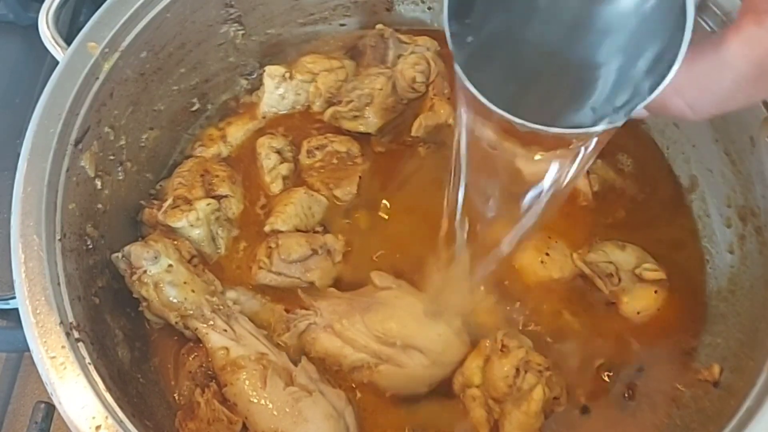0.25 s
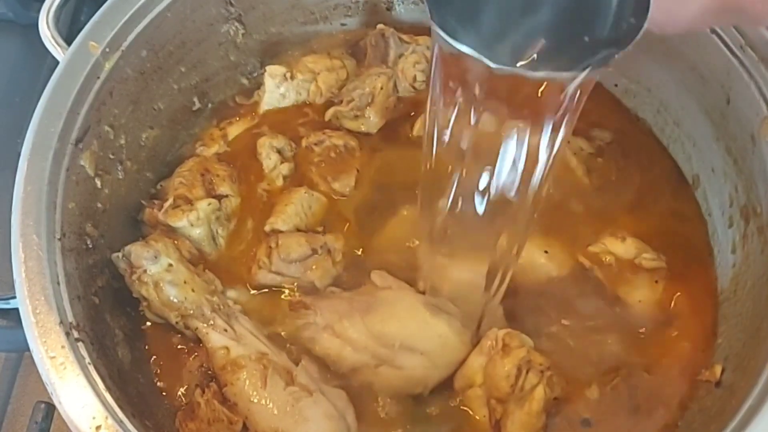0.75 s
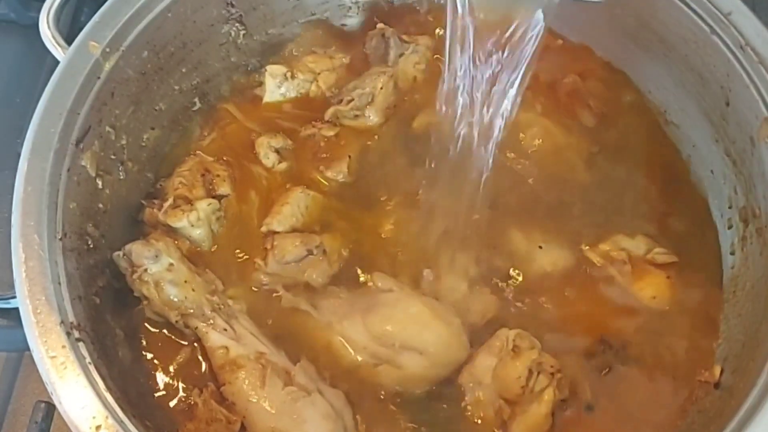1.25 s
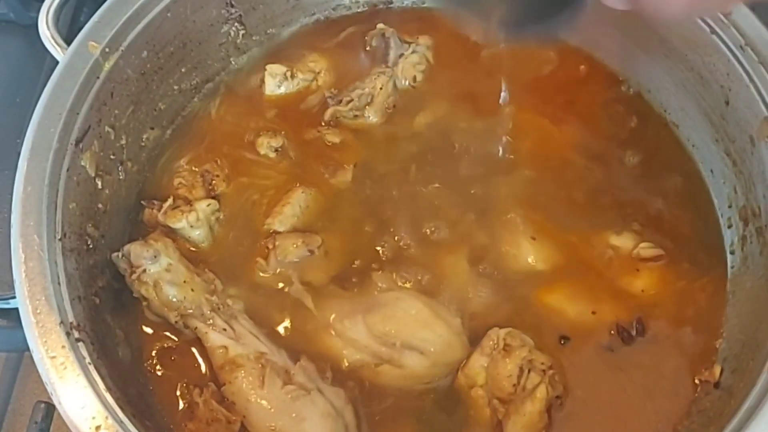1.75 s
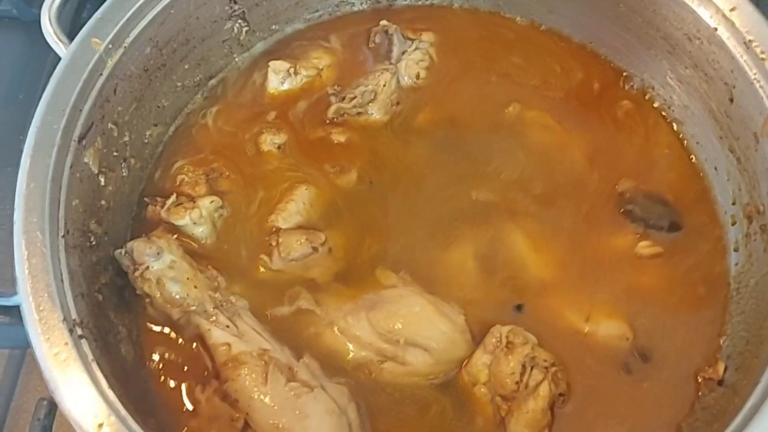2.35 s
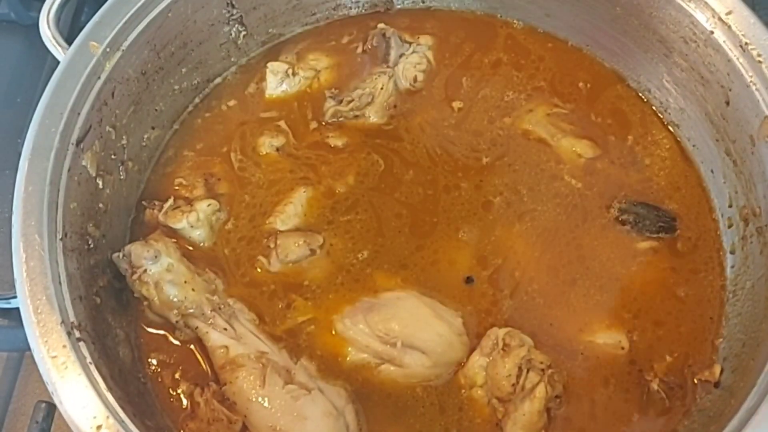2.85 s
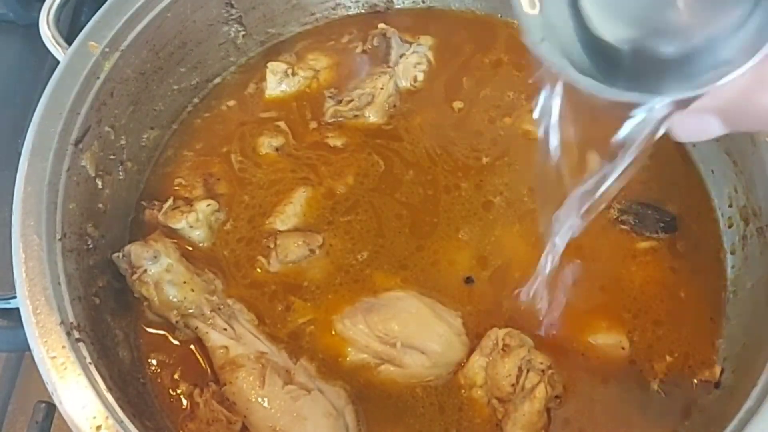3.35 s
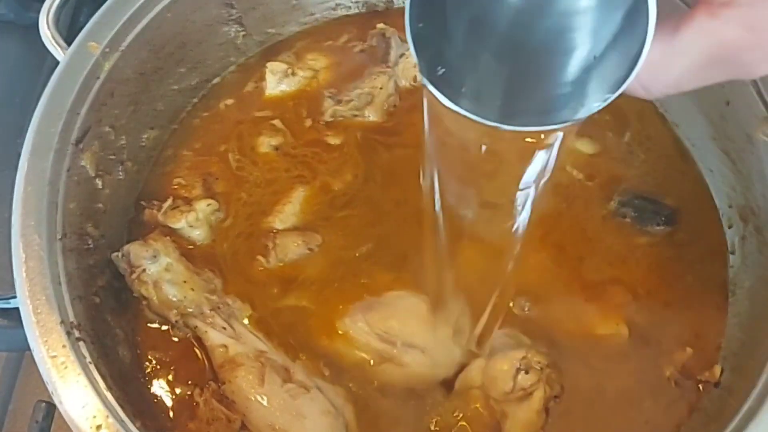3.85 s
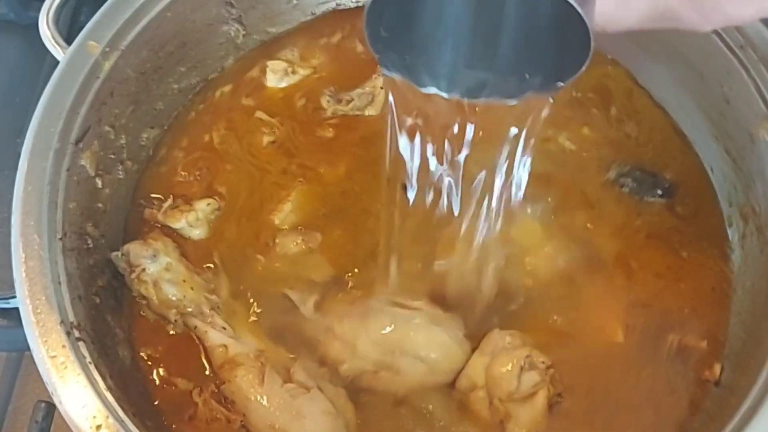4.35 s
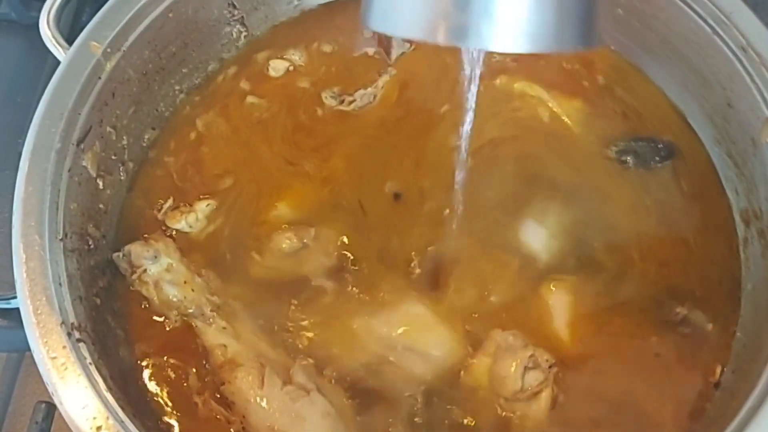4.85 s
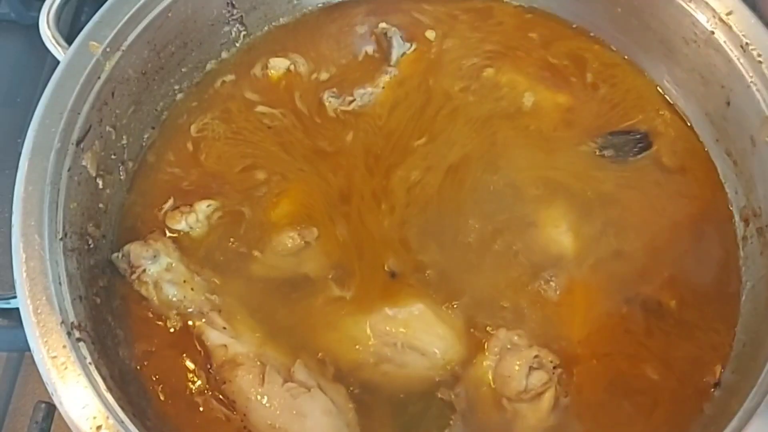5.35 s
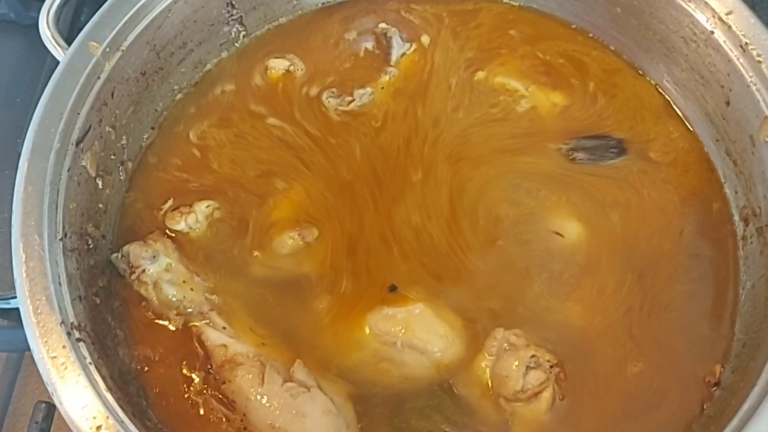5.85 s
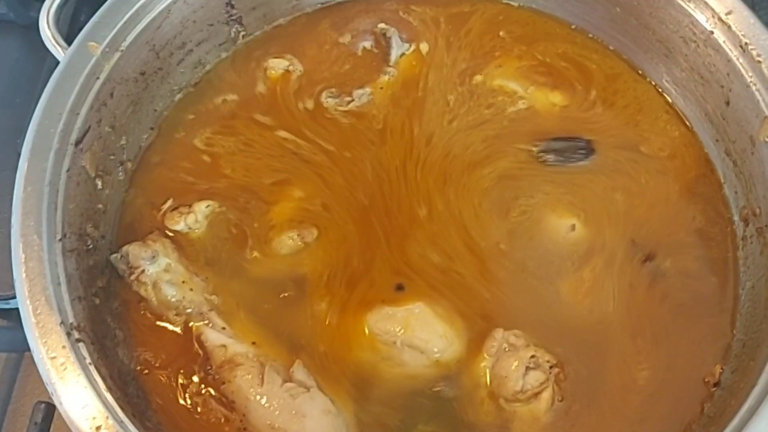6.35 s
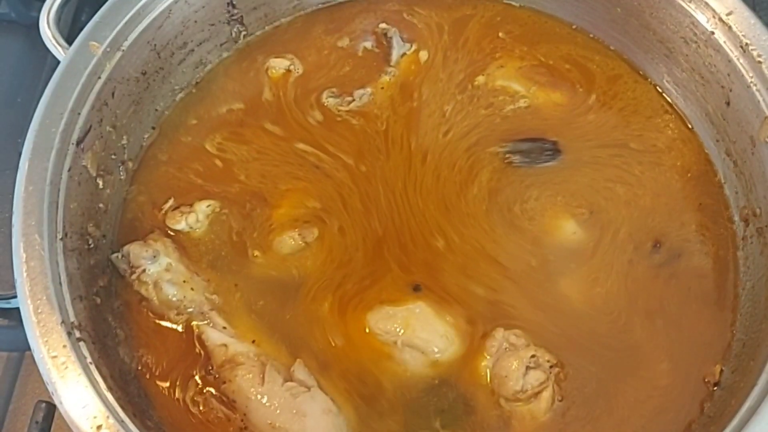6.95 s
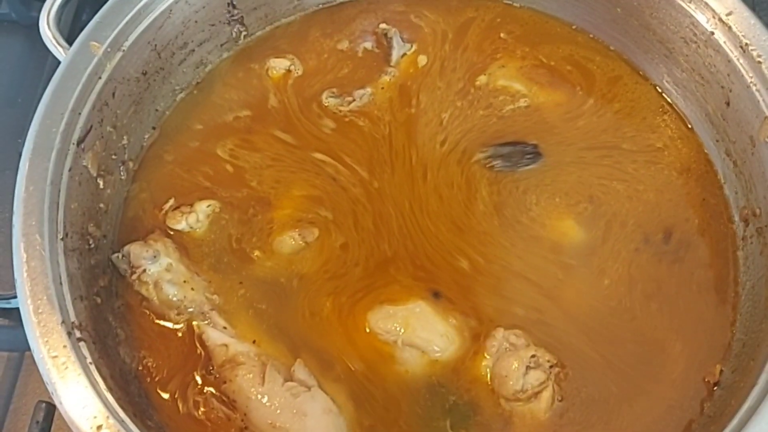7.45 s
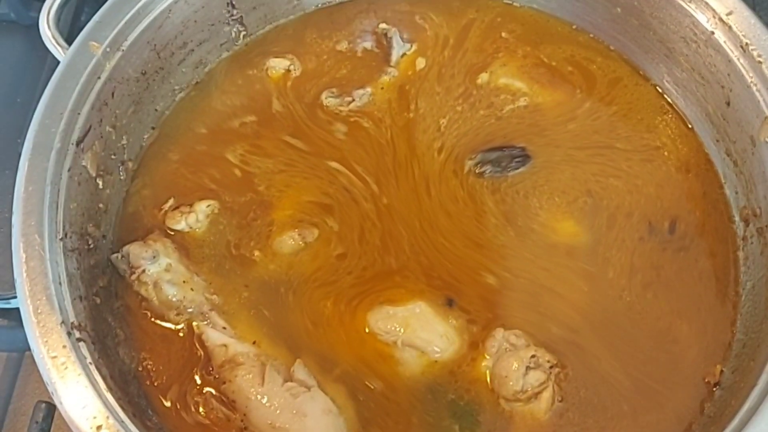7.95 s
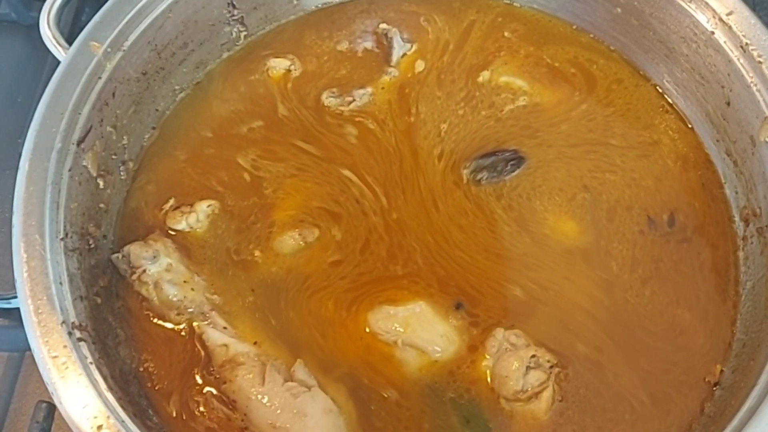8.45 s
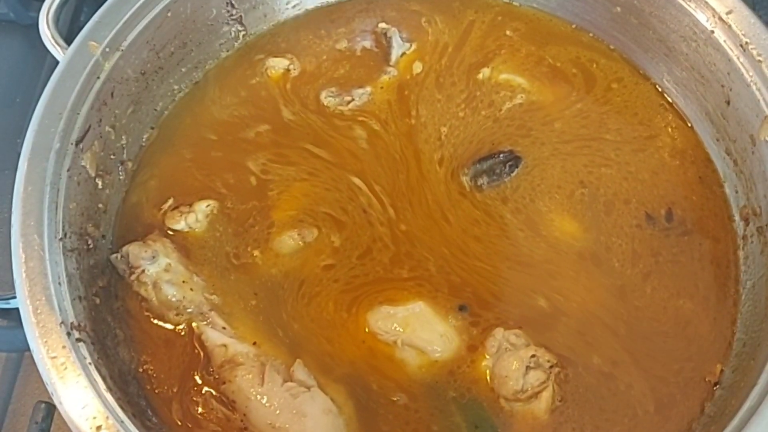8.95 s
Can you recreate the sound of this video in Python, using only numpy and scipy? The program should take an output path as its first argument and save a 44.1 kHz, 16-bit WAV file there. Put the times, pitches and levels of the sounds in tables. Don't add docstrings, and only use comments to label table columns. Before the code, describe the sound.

In a home kitchen, close above a steel pot, a cup of water is poured into stew with a knock on the metal, bright hiss and ringing bubbles, then stops short. A second, lighter pour follows and thins to drips and faint fizz. A steel cup thuds and rings on the counter, twice, with soft hand scuffs. A low fan drones throughout.

```python
import sys
import numpy as np
from scipy import signal
from scipy.io import wavfile
from scipy.ndimage import uniform_filter1d

SR = 44100
rng = np.random.default_rng(int(sys.argv[2]) if len(sys.argv) > 2 else 0)


def store_pcm(level_fs):
    pcm = np.round(np.clip(level_fs, -1, 1) * 32767).astype(np.int16)
    wavfile.write(sys.argv[1], SR, np.atleast_2d(pcm).T)


def rack_gain(trim_db):
    fader = np.asarray(trim_db, float)
    return 10 ** (fader / 20)


N = 405719
FIZZ_FROM_S = 3.06

POT_AIR_HZ = [1770, 2730, 4090, 5500, 6600, 8200]
# start_s, peak_db
FIRST_LANDING = [
    (6.6843, -14),
    (6.692, -17.5),
    (6.717, -27.5),
    (7.036, -62),
    (7.077, -52),
]
# start_s, peak_db
SECOND_LANDING = [
    (7.811, -54),
    (7.843, -15),
    (7.853, -32),
    (7.862, -18),
    (7.877, -18.5),
    (7.885, -37),
    (7.905, -51),
]


def evened(x):
    return x / np.sqrt(np.mean(x ** 2) + 1e-20)


def read(points, hz):
    f, value = np.transpose(points)
    return np.interp(np.log(hz + 1), np.log(f + 1), value)


def add(mix, s, sound):
    part = mix[round(s * SR):][:len(sound)]
    part += sound[:len(part)]


def resonate(x, hz, width_hz):
    radius = np.exp(-np.pi * width_hz / SR)
    turn = np.exp(2j * np.pi * hz / SR)
    return 2 * signal.lfilter([1 - radius], [1, -radius * turn], x).real


def noise(level_db, size):
    t = np.arange(4 * N // size + 6) * size / 4 / SR
    hz = np.fft.rfftfreq(size, 1 / SR)
    real, imaginary = rng.standard_normal((len(t), len(hz), 2)).T
    gain = rack_gain(level_db(t, hz[:, None])) * np.sqrt(2 * SR / size)
    spectra = (real + 1j * imaginary) * gain
    return signal.istft(spectra, nperseg=size, noverlap=3 * size // 4)[1][:N]


def blotches(t, hz, frames, bins):
    field = rng.standard_normal((len(t), len(hz))).T
    return evened(uniform_filter1d(uniform_filter1d(field, frames, 1), bins, 0))


def coloured(x, points):
    log_gain = np.log(rack_gain(read(points, abs(np.fft.fftfreq(4096, 1 / SR)))))
    taps = np.fft.ifft(np.exp(np.conj(signal.hilbert(log_gain)))).real[:2048]
    return signal.oaconvolve(x, taps)[:len(x)]


def strokes(rows, t, rise, fall):
    db = [level - rise * np.maximum(s - t, 0) - fall * np.maximum(t - s - hold, 0) for s, level, hold in rows]
    return np.maximum(np.max(db, axis=0), -110)


def flow(t):
    # start_s, flow_db, spread (0 narrow jet to 1 broad sheet)
    pours = [
        [(0.0, -50.5, 0.2), (0.1, -54, 0.2), (0.23, -58.5, 0.8), (0.46, -60.5, 0.8), (0.69, -56, 0.25),
         (0.95, -46, 0.5), (1.2, -47, 0.43), (1.75, -54.5, 0.15), (2.09, -55, 0.04)],
        [(3.57, -53, 0.4), (3.79, -62, 0.7), (3.87, -57, 0), (4.06, -53.5, 0.9), (4.25, -60, 0.9),
         (4.66, -60.5, 0.4), (5.2, -64, 0.8), (6.04, -75, 0.05), (6.66, -68.5, 0.4)],
    ]
    # start_s, flow_db, hold_s
    slops = [
        (3.085, -60.5, 0.077),
        (3.196, -57, 0.13),
        (3.4, -62, 0.028),
    ]
    db = strokes(slops, t, rise=4300, fall=230)
    spread = np.full(len(t), 0.31)
    for rows in pours:
        s, level, wide = np.transpose(rows)
        on = (t >= s[0]) & (t <= s[-1])
        db[on] = np.interp(t[on], s, level)
        spread[on] = np.interp(t[on], s, wide)
    return db, spread


def water_db(t, hz):
    water_hz = [1400, 2800, 6400, 13000]
    jet_db = [-41, -44.5, -38.5, -46.5]
    sheet_db = [-32, -38, -44.5, -42]
    db, spread = flow(t)
    jet = read(list(zip(water_hz, jet_db)), hz)
    sheet = read(list(zip(water_hz, sheet_db)), hz)
    return db + jet + spread * (sheet - jet) - 30 * (hz < 900)


def spray():
    def level(t, hz):
        broad_flicker = 2.0 * blotches(t, hz, frames=5, bins=45)
        narrow_flicker = 2.1 * blotches(t, hz, frames=14, bins=3)
        return water_db(t, hz) - 1.0 + broad_flicker + narrow_flicker
    return noise(level, size=128)


def bubble(hz, cycles, rise):
    turns = np.arange(1200) * hz / SR
    tone = np.sin(2 * np.pi * turns * (1 + rise * turns / cycles))
    return tone * np.exp(-2.0 * turns / cycles) * np.minimum(turns / 1.8, 1)


def puff(hz, share, quick_s, slow_s, tail):
    t = np.arange(900) / SR
    burst = rng.standard_normal(len(t)) * (np.exp(-t / quick_s) + tail * np.exp(-t / slow_s))
    return resonate(resonate(burst, hz, share * hz), hz, share * hz) / np.sqrt(share * hz / SR)


def froth():
    out = np.zeros(N)
    t = np.arange(0, N + 64, 64) / SR
    now = np.arange(N) / SR
    crowd = np.interp(now, t, np.clip(rack_gain(0.6 * (flow(t)[0] + 56)), 0.4, 3))
    for hz in np.geomspace(1900, 15000, num=36):
        size = rack_gain(4.5 * np.minimum(rng.exponential(1, N), 3))
        size *= (rng.random(N) < 32.0 * crowd / SR) / crowd ** 0.7
        distance = np.min(abs(np.log(hz / np.array(POT_AIR_HZ))))
        favoured_db = 6.0 * np.exp(-(distance / 0.05) ** 2)
        size *= rack_gain(np.interp(now, t, water_db(t, hz)) + 32.0 + favoured_db)
        size *= rack_gain(1.0 * np.log2(hz / 6000))
        ring = bubble(hz, cycles=rng.uniform(2.0, 37.0), rise=rng.uniform(0, 0.04))
        out += signal.oaconvolve(size, ring)[:N]
    return out * rack_gain(-14.0 * np.maximum(now - 4, 0))


def gurgle():
    # start_s, end_s, pitch_hz, level_db over the flow
    runs = [
        (0.8, 2.05, 4090, 0),
        (0.9, 1.35, 1780, -8),
        (0.9, 1.2, 3200, -2),
        (3.8, 4.17, 2700, 5),
        (3.9, 4.3, 3800, 2),
        (3.85, 4.15, 5300, 2),
        (1.1, 1.9, 6500, 0),
        (3.15, 3.33, 3400, 0),
        (3.6, 3.67, 2300, 0),
        (4.05, 4.15, 2000, 0),
    ]
    out = np.zeros(N)
    now = np.arange(N) / SR
    level = rack_gain(flow(now)[0])
    bubbles_per_s = 110.0
    for start, end, hz, db in runs:
        for pitch in (0.95, 0.985, 1.02, 1.06):
            size = rack_gain(db + 3.0 * np.minimum(rng.exponential(1, N), 3))
            size *= rng.random(N) < bubbles_per_s / 4 / SR
            size *= level * (now > start) * (now < end)
            out += signal.oaconvolve(size, bubble(pitch * hz, 18, rise=0.02))[:N]
    return out


def plops():
    # start_s, peak_db, pitch_hz
    first_pour = [(0.031, -29, 3550), (0.081, -35, 5500), (0.092, -31, 3400), (0.1469, -50, 13090),
                  (0.163, -33.5, 3230), (0.2093, -37, 4500), (0.3871, -45, 7060), (0.5865, -36, 2670),
                  (0.622, -38.5, 3970), (0.7118, -30, 3720), (0.7108, -31, 2550), (0.7143, -32, 5140),
                  (0.7637, -37.5, 5200), (0.7966, -34, 1880), (0.8484, -31, 3920), (0.88, -31, 3980),
                  (0.93, -34, 11400), (0.947, -33, 5570), (0.971, -41, 1840), (0.976, -42, 4200),
                  (1.075, -40, 1780), (1.141, -29.5, 3770), (1.394, -32.5, 3040), (1.561, -36, 8000),
                  (1.6439, -37.5, 6850), (1.755, -39, 8450), (1.784, -36, 6000), (1.884, -41, 7920),
                  (2.091, -47, 10700), (1.21, -40, 6550)]
    # start_s, peak_db, pitch_hz
    second_pour = [(3.0917, -49, 8440), (3.1292, -45, 5600), (3.1626, -38, 2600), (3.1953, -38, 5600),
                   (3.2156, -38, 3100), (3.225, -36, 4700), (3.225, -38, 7700), (3.2374, -37, 6060),
                   (3.279, -39.5, 7600), (3.3106, -41, 3930), (3.4986, -49, 5900), (3.5733, -39, 7460),
                   (3.6169, -33.5, 4200), (3.635, -37.5, 2620), (3.83, -33.5, 2500), (3.8621, -38, 2540),
                   (3.9434, -44, 7900), (4.0254, -38, 6650), (4.0392, -38, 5880), (4.0682, -36.5, 5470),
                   (4.0638, -39, 2630), (4.1161, -37, 8260), (4.125, -34, 2700), (4.1618, -36, 3720),
                   (4.2496, -39, 4200), (4.306, -36, 7160), (4.4985, -39.5, 3750), (4.641, -29.5, 7130),
                   (4.6757, -39, 4400), (6.3074, -43.5, 7550)]
    # start_s, peak_db, pitch_hz
    fainter = [(.205, -42, 7900), (.261, -49, 6450), (.270, -51, 8600), (.527, -44.5, 4300),
               (.540, -48, 8500), (.645, -38, 6800), (0.698, -43, 5170), (.794, -42, 6760),
               (1.061, -36, 2600), (1.255, -49, 8500), (1.357, -39, 5030), (1.44, -44, 6860),
               (1.598, -42, 7700), (1.622, -41, 7300), (1.842, -45, 3970), (1.867, -41, 8200),
               (2.027, -39, 6400), (3.152, -45, 8000), (3.205, -42, 6500), (3.255, -43, 8700),
               (3.292, -43, 7500), (3.361, -49.5, 6100), (3.47, -46, 3080), (3.553, -45, 4100),
               (3.603, -42, 7900), (3.655, -43, 5850), (3.746, -49, 7900), (3.807, -49, 8200),
               (3.855, -44, 7350), (3.92, -39.5, 2680), (3.965, -39, 2700), (4.275, -53, 8150),
               (4.296, -40, 2780), (4.334, -49, 7100), (4.427, -49, 7900), (4.45, -45, 4930),
               (4.517, -43, 2500), (4.535, -45, 7750), (4.578, -45, 7200), (4.617, -42, 2660),
               (5.0, -51, 7140), (5.113, -54, 8000)]
    out = np.zeros(N)
    for s, db, hz in first_pour + second_pour + fainter:
        cycles = np.clip(0.0022 * hz, 7, 30)
        splash = puff(1.06 * hz, share=0.24, quick_s=0.0024, slow_s=0.005, tail=0.2)
        rustle = puff(hz, share=0.12, quick_s=0.005, slow_s=0.008, tail=0.4)
        add(out, s, rack_gain(db + 2.5) * bubble(hz, cycles, rise=0.03))
        add(out, s, rack_gain(db - 11.5) * splash)
        add(out, s + 0.003, rack_gain(db - 19.0) * rustle)
    return out


def ticks():
    # start_s, peak_db
    drops = [(0.1453, -30), (0.4255, -37), (0.492, -40), (0.919, -32), (1.0453, -26.5), (1.154, -30),
             (1.387, -33), (1.7207, -32), (1.753, -34), (3.088, -41), (3.198, -37), (3.2633, -36),
             (3.7022, -54), (3.7287, -46), (3.8868, -34.5), (3.9551, -42), (4.115, -30.5), (4.16, -33),
             (4.212, -36), (4.568, -36), (4.605, -38), (4.6397, -41), (4.676, -39), (4.823, -42),
             (4.9733, -43), (5.2218, -39.5), (5.742, -49), (6.31, -38.5), (6.4669, -48), (6.508, -44.5)]
    # pitch_hz, level_db per Hz
    tick_colour = [(1500, -24), (3500, 0), (7000, -4), (10000, -2)]
    out = np.zeros(N)
    t = np.arange(900) / SR
    fade = np.exp(-t / 0.0039) + 0.44 * np.exp(-t / 0.022)
    for s, db in drops:
        add(out, s, rack_gain(db - 9.0) * rng.standard_normal(len(t)) * fade)
    return coloured(out, tick_colour)


def specks():
    # start_s, peak_db, centre_hz
    first_pour = [(0.0224, -40, 11000), (0.0428, -43, 11500), (0.0797, -41, 14900), (0.2094, -45, 12000),
                  (0.2414, -47, 12600), (0.2853, -46, 15700), (0.2972, -41, 11200), (0.3084, -48, 12200),
                  (0.3671, -53, 10400), (0.401, -47, 12400), (0.4653, -50, 12300), (0.5117, -48, 13900),
                  (0.5264, -41, 11600), (0.5656, -49, 12700), (0.6095, -42, 12400), (0.6534, -46, 15600),
                  (0.6624, -46, 11600), (0.6863, -47, 12600), (0.7287, -44, 12600), (0.7677, -47, 12200),
                  (0.7944, -43, 14100), (0.8634, -39, 12300), (0.9034, -35, 12200), (0.9844, -28, 14900),
                  (1.0024, -39, 12600), (1.256, -32, 11400), (1.4671, -40, 12700), (1.4874, -38, 12300),
                  (1.5459, -37, 13300), (1.5744, -34, 11900), (1.6334, -36, 13000), (1.6654, -44, 13100),
                  (1.7784, -41, 12000), (1.8484, -47, 10100), (1.8667, -38, 11500), (1.9769, -45, 10900),
                  (2.0068, -39, 12100), (2.0263, -46, 13000), (2.0764, -44, 10900)]
    # start_s, peak_db, centre_hz
    second_pour = [(3.0624, -54, 12100), (3.1198, -46, 15300), (3.2131, -38, 12500), (3.3243, -41, 12500),
                   (3.3882, -50, 12700), (3.5019, -47, 13600), (3.5389, -53, 14300), (3.5874, -50, 14700),
                   (3.6032, -47, 13000), (3.7723, -50, 14600), (3.7958, -46, 15700), (3.8482, -44, 14000),
                   (3.9074, -43, 14200), (3.9624, -36, 11500), (4.0317, -45, 15400), (4.0464, -43, 14700),
                   (4.1455, -43, 12200), (4.2547, -53, 14500), (4.2877, -52, 12600), (4.2961, -41, 12700),
                   (4.3365, -49, 15600), (4.3475, -50, 15200), (4.4343, -45, 13700), (4.4548, -44, 11400),
                   (4.4902, -47, 12700), (4.5296, -44, 12800), (4.7167, -43, 13500), (4.7446, -47, 13700),
                   (4.8599, -40, 15100), (4.8798, -45, 11000), (4.9247, -45, 11800), (5.006, -46, 14100),
                   (5.0519, -50, 14700), (5.0843, -50, 13700), (5.1248, -47, 11400), (5.1746, -49, 11900),
                   (5.2614, -47, 11800), (5.2999, -53, 15100), (5.3318, -46, 11800), (5.3966, -44, 11900),
                   (5.4974, -50, 11800), (5.5633, -49, 13100), (5.6012, -47, 12900), (5.6301, -50, 15100),
                   (5.7513, -45, 10700), (5.8406, -56, 13400), (6.0945, -56, 13900), (6.2567, -55, 11500),
                   (6.5635, -53, 11700), (6.6174, -60, 11100), (7.2853, -55, 11900), (7.4684, -53, 12300),
                   (7.5213, -54, 11900), (7.6494, -55, 12100), (7.7294, -58, 11100)]
    out = np.zeros(N)
    for s, db, hz in first_pour + second_pour:
        droplet = puff(min(hz, 15500), share=0.48, quick_s=0.0016, slow_s=0.0055, tail=0.2)
        add(out, s, rack_gain(db - 14.5) * droplet)
    return out


def fizz():
    # pitch_hz, level_db per Hz
    foam_colour = [(3000, -28), (5000, -16), (8000, -10), (12000, 1)]
    # pitch_hz, level_db per Hz
    simmer_colour = [(2500, -18), (4500, -16), (8000, 6.5), (15000, 1)]
    age = np.arange(N) / SR - FIZZ_FROM_S
    bursts = rack_gain(3.0 * np.minimum(rng.exponential(1, N), 3))
    bursts *= (rng.random(N) < 60.0 / SR) * (age > 0)
    shape = signal.lfilter([1], [1, -np.exp(-1 / (0.00174 * SR))], bursts)
    fade = rack_gain(-65 - 3.2 * np.maximum(age - 3.4, 0))
    simmer = rack_gain(-78.5) * (age > 0) * coloured(rng.standard_normal(N), simmer_colour)
    return coloured(fade * shape * rng.standard_normal(N), foam_colour) + simmer


def strike(blows, modes, crack_db, crack_s, rise_s):
    # pitch_hz, level_db per Hz
    crack_colour = [(150, -2), (300, 16), (800, 10.5), (2000, 4), (4000, -0.5), (8000, -7.5), (16000, -10)]
    out = np.zeros(N)
    t = np.arange(SR // 2) / SR
    ring = sum(-rack_gain(level - 60 * t / t60) * np.sin(2 * np.pi * hz * t) for hz, level, t60 in modes)
    for s, db in blows:
        crack = rack_gain(crack_db) * coloured(rng.standard_normal(len(t)), crack_colour) * np.exp(-t / crack_s)
        add(out, s, rack_gain(db) * (ring * np.minimum(t / rise_s, 1) + crack))
    return out


def pot_knock():
    # start_s, peak_db
    blows = [
        (0.1203, -19),
        (0.163, -31),
        (0.187, -30),
    ]
    # pitch_hz, level_db, t60_s
    pot_modes = [(600, -5, .1), (1018, -3, .16), (1087, 2, .05), (1175, -2, .06), (1311, -7, .16),
                 (1586, -2, .05), (1743, -11, .14), (2180, -10, .2), (2292, -11, .3), (3050, -13, .03),
                 (5300, -9, .025), (6100, -9, .025), (7400, -7, .02), (8050, -9, .022)]
    hard = strike(blows[:1], pot_modes, crack_db=-4, crack_s=0.012, rise_s=0.00033)
    soft = strike(blows[1:], pot_modes[:5], crack_db=-30, crack_s=0.012, rise_s=0.002)
    return rack_gain(-10) * (hard + soft)


def board():
    # pitch_hz, level_db, t60_s
    counter_modes = [(111, 5, 0.28), (204, 7, 0.13), (245, 14, 0.055), (286, -2, 0.25), (332, 0, 0.15),
                     (393, 12.5, 0.05), (386, -3, .35), (550, -6, 0.11), (700, -6, 0.07), (864, -4, 0.05)]
    # pitch_hz, level_db, t60_s
    edge_modes = [(110, 1, 0.19), (246, 5, 0.15), (347, 2, 0.08), (369, 4, .14), (480, -3, 0.14),
                  (600, -4, 0.1), (718, -7, 0.15), (1050, -8, 0.05), (1430, -13, .07), (1620, -13, .09),
                  (1830, -15, .07), (2000, -12, 0.04), (3300, -18, .03), (3520, -16, .03)]
    first = strike(FIRST_LANDING[:3], counter_modes, crack_db=2.5, crack_s=0.028, rise_s=0.0027)
    second = strike(SECOND_LANDING[1:], edge_modes, crack_db=-4.5, crack_s=0.0071, rise_s=0.001)
    return rack_gain(-5.5) * first + rack_gain(-10.5) * second


def clustered(pitches, rings, spread, db):
    near = rng.uniform(-spread, spread, (len(pitches), 3))
    modes = [(hz, *ring) for hz, ring in zip(pitches, rings)]
    neighbours = [(hz * (1 + shift), level + db, 0.7 * t60)
                  for (hz, level, t60), row in zip(modes, near) for shift in row]
    return modes + neighbours


def cup():
    upright_hz = [2699, 2783, 2967, 4190, 4514, 6164, 6340, 8150, 8366, 11200, 11860, 12770, 13440]
    # level_db, t60_s
    upright_rings = [(-20, 0.42), (-26, 0.35), (-30, 0.22), (-26, .2), (-18, 0.4), (-28, 0.2), (-23, .3),
                     (-32, .25), (-26, 0.35), (-30, .2), (-21, 0.1), (-28, .17), (-26, .17)]
    aslant_hz = [2666, 2772, 3046, 3490, 4733, 5733, 6055, 7550, 7971, 8361, 10940, 11550, 11910, 14430]
    # level_db, t60_s
    aslant_rings = [(-7, 0.5), (-10, 0.5), (-9, 0.2), (-12, .08), (-5, 0.15), (-19, 0.25), (-12, 0.27),
                    (-17, .25), (-15, 0.24), (-17, 0.25), (-13, 0.12), (-16, .15), (-11, .17), (-14, 0.12)]
    rim_hz = [2740, 4300, 7700, 8400, 10900, 11700, 12800, 14600]
    # level_db, t60_s
    rim_rings = [(-6, .04), (-12, .03), (-5, .04), (-1, .04), (-2, .04), (-2, .05), (-5, .04), (-4, .04)]
    # start_s, peak_db
    freed = [
        (6.6843, -16.5),
        (6.717, -18.5),
        (6.744, -24),
    ]
    upright = clustered(upright_hz, upright_rings, spread=0.03, db=-8)
    aslant = clustered(aslant_hz, aslant_rings, spread=0.025, db=-6)
    rim = clustered(rim_hz, rim_rings, spread=0.05, db=-5.5)
    first = rack_gain(0.5) * strike(freed, upright, crack_db=-43, crack_s=0.014, rise_s=0.00045)
    rocking = strike(FIRST_LANDING[3:], rim, crack_db=-7.5, crack_s=0.0063, rise_s=0.00047)
    second = rack_gain(-17) * strike(SECOND_LANDING[1::3], aslant, crack_db=-3, crack_s=0.003, rise_s=0.0002)
    t = np.arange(N) / SR
    gripped_s = np.where(t < 7.03, 6.86, 7.97)
    grip = rack_gain(-350 * np.maximum(t - gripped_s, 0))
    return (first + second) * grip + rocking * rack_gain(-150 * np.maximum(t - 7.08, 0))


def scuffs():
    # start_s, level_db, hold_s, brightness_db per octave
    slides = [
        (7.073, -56, 0.018, 6),
        (7.377, -66.5, 0.09, 14.5),
        (7.815, -50, 0.044, 2),
        (8.251, -51.5, 0.032, 6),
        (8.554, -48.5, 0.073, 1),
        (8.86, -57, .03, -1),
        (9.018, -59, 0.016, -1),
    ]
    # pitch_hz, level_db per Hz over the slide's level
    slide_colour = [(1400, -34), (2800, -40.5), (6400, -49), (13000, -59.5)]

    def level(t, hz):
        each = []
        for row in slides:
            tilt = row[3] * np.log2(hz / 6000 + 0.1)
            each.append(strokes([row[:3]], t, rise=810, fall=145) + tilt)
        grain = 0.41 * blotches(t, hz, frames=5, bins=20)
        return np.max(each, axis=0) + read(slide_colour, hz) - 30 * (hz < 900) + grain
    return noise(level, size=256)


def fan():
    # pitch_hz, level_db per Hz
    roar_colour = [(13, -74), (22, -49), (46, -3), (70, -7), (85, -4.5), (103, -3.5), (229, -12.5),
                   (276, -12), (417, -17.5), (579, -24), (642, -19.5), (711, -20.5), (1160, -24.5),
                   (1350, -32), (3000, -43.5), (3900, -48.5), (6600, -120)]
    # pitch_hz, width_hz, level_db
    fuzzy_tones = [(102.2, 9, -40), (144.7, 14, -53.5), (284.4, 40, -48.5), (403, 64, -86),
                   (482.7, 72, -54.5), (629.4, 17, -59.5), (984, 24, -61), (1207, 64, -64),
                   (1724, 340, -66), (2435, 160, -74), (4200, 400, -78.5)]
    # start_s, level_db
    swell = [(0.0, -40.5), (0.18, -32), (0.5, -42), (1.25, -33), (1.6, -42.5), (3.1, -34.5), (3.75, -39.5),
             (4.05, -33.5), (4.45, -42), (5.02, -38), (6.5, -39.5), (8.6, -39.5), (9.2, -36.5)]
    # pitch_hz, level_db per Hz
    air_colour = [(1400, -91), (2000, -99), (3000, -103), (4200, -105), (5500, -111), (9000, -116),
                  (16000, -126)]
    roar = noise(lambda t, hz: read(roar_colour, hz) + 1.16 * blotches(t, hz, frames=6, bins=8), size=2048)
    tones = []
    for hz, width_hz, db in fuzzy_tones:
        tone = resonate(resonate(rng.standard_normal(N), hz, width_hz), hz, width_hz)
        tones.append(rack_gain(db) * evened(tone))
    steady = evened(tones[0] / abs(signal.hilbert(tones[0])) ** 0.6)
    s, db = np.transpose(swell)
    tones[0] = steady * rack_gain(fuzzy_tones[0][2]) * rack_gain(np.interp(np.arange(N) / SR, s, db - db.mean()))
    hiss = noise(lambda t, hz: read(air_colour, hz) - 30 * (hz < 1300) + 0 * t, size=512)
    return rack_gain(-35.5 - 4.5) * evened(roar) + sum(tones) + hiss


def kitchen(x):
    # pitch_hz, t60_s
    room_t60 = [(100, 0.091), (400, 0.38), (1500, 0.4), (4000, 0.41), (12000, 0.31)]
    taps = np.zeros(SR)
    at = np.arange(120, SR - 20, 20)
    taps[at + rng.integers(0, 20, len(at))] = rng.choice([-1.0, 1.0], len(at))
    hz, t, z = signal.stft(taps, SR, nperseg=256)
    decay = rack_gain(-60 * t / read(room_t60, hz)[:, None])
    tail = signal.istft(z * decay, SR, nperseg=256)[1]
    return signal.fftconvolve(x, tail / np.linalg.norm(tail))[:N]


def scene():
    water = froth() + gurgle() + plops() + ticks() + fizz() + specks()
    splash = spray()
    boom = rack_gain(-23.0) * sum(resonate(splash + water, hz, width_hz=41) for hz in POT_AIR_HZ)
    thud = board()
    steel = cup() + pot_knock()
    dull_thud = coloured(thud, [(300, -6), (1000, 0)])
    echo = kitchen(rack_gain(-11) * water + rack_gain(-9) * steel + rack_gain(-1.5) * dull_thud)
    t = np.arange(N) / SR
    heard = (t < 2.096) | (t > FIZZ_FROM_S)
    mix = (water + splash + boom + echo) * heard + scuffs() + thud + steel + fan()
    return mix[None]


def top_cut(x):
    return signal.sosfilt(signal.butter(12, 16830, fs=SR, output="sos"), x)


def record(dry):
    # pitch_hz, gain_db
    mic_response = [(30, -16), (70, 0.5), (4000, 1), (8600, 5), (9250, -4), (10300, -1.5), (11700, 3),
                    (15400, 0.5)]
    # start_s, end_s, low_hz, high_hz
    dropout = (7.848, 8.015, 9030, 10130)
    x = coloured(dry[0], mic_response)
    power_db = 10 * np.log10(abs(uniform_filter1d(x ** 2, 600)) + 1e-12)
    fall = np.arange(N) * 3.9 / SR
    held_db = np.maximum.accumulate(power_db + fall) - fall
    over_db = np.maximum(held_db + 16.5, 0)
    x = x / rack_gain(0.62 * uniform_filter1d(over_db, 400))
    hz, t, z = signal.stft(x, SR, nperseg=512)
    start, end, low, high = dropout
    lost = z * np.outer((hz > low) & (hz < high), (t > start) & (t < end))
    x = x - signal.istft(lost, SR, nperseg=512)[1][:N]
    x = signal.oaconvolve(x, signal.firwin(255, 15900, fs=SR), "same")
    return top_cut(x[None])


dry = scene()
out = record(dry)
store_pcm(out)
```